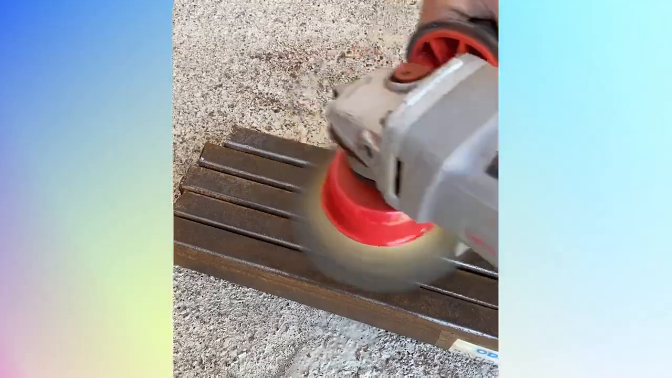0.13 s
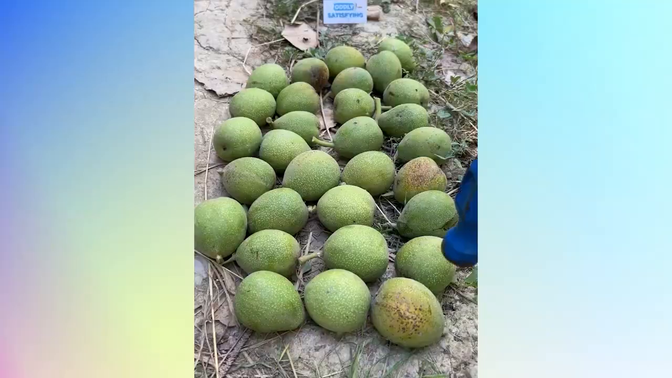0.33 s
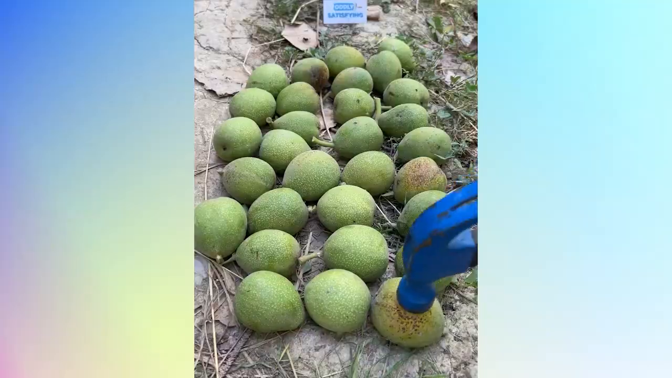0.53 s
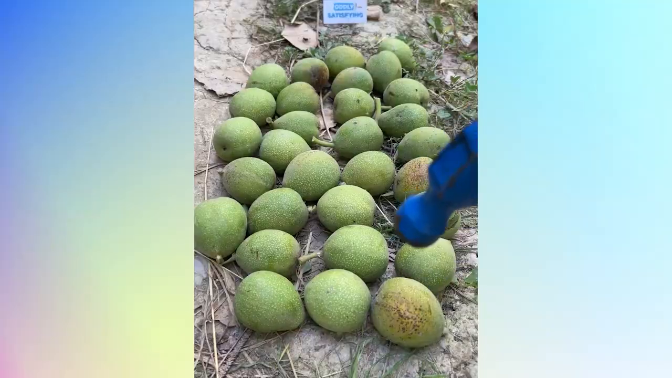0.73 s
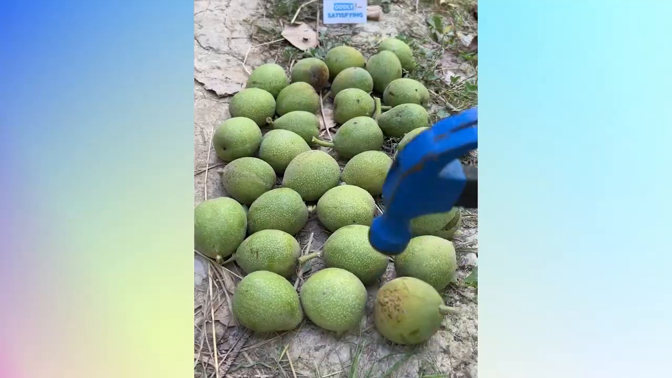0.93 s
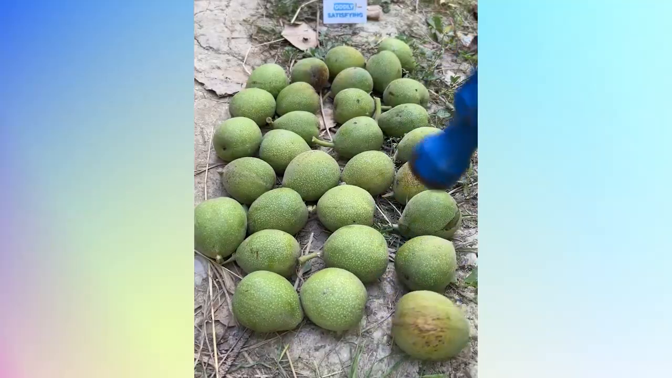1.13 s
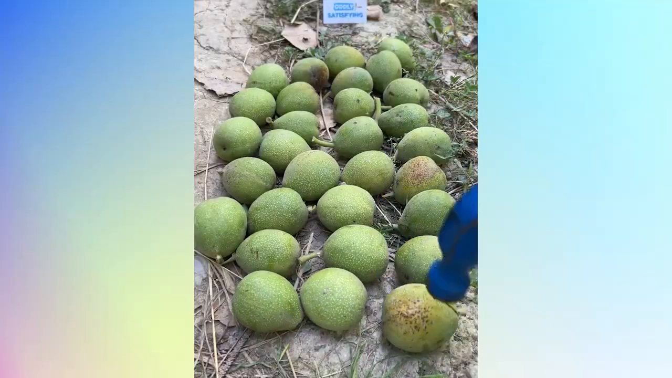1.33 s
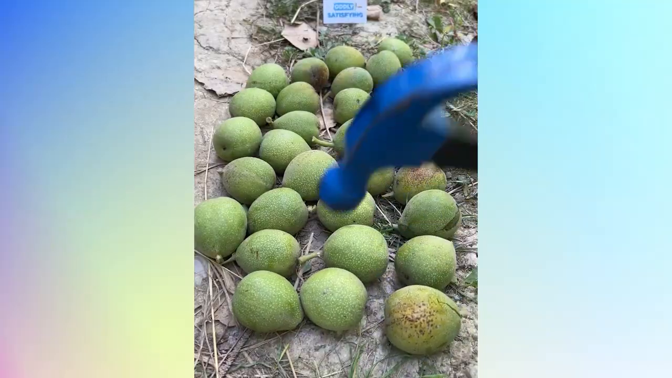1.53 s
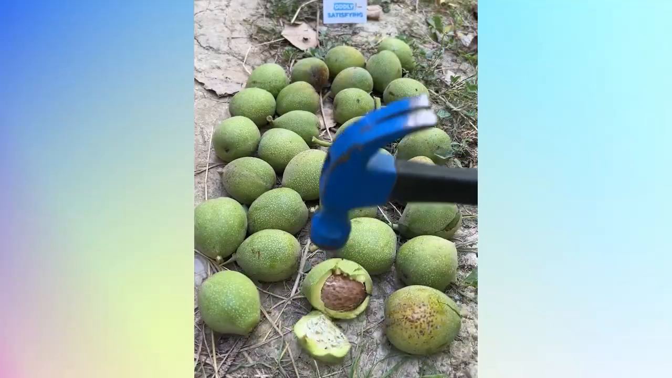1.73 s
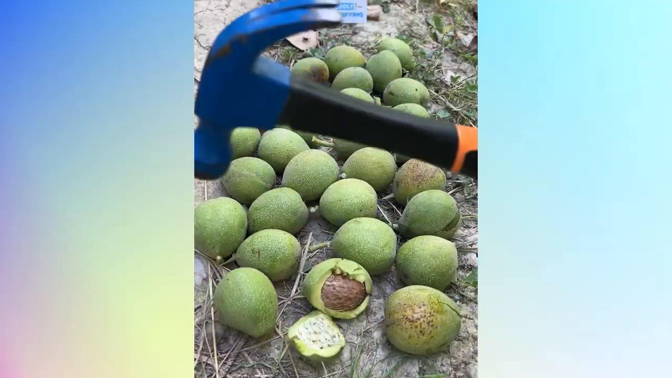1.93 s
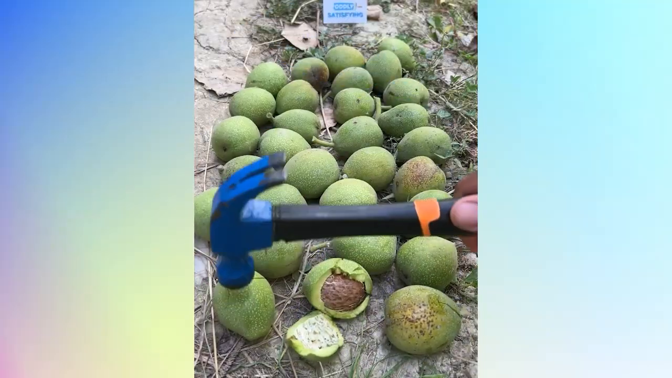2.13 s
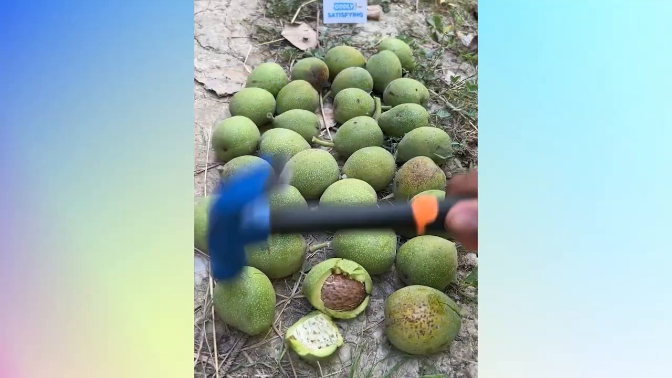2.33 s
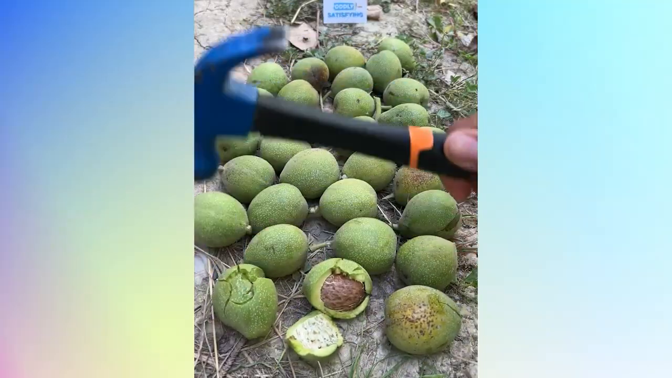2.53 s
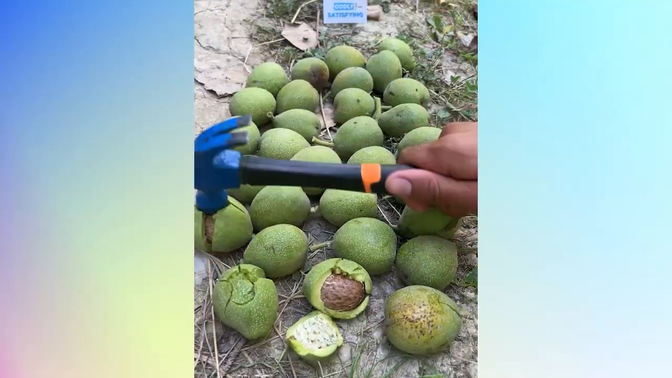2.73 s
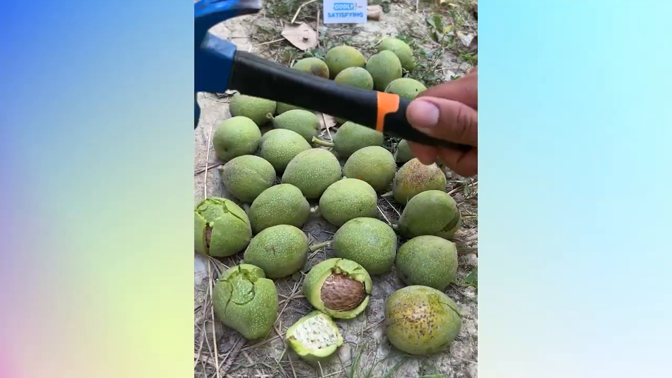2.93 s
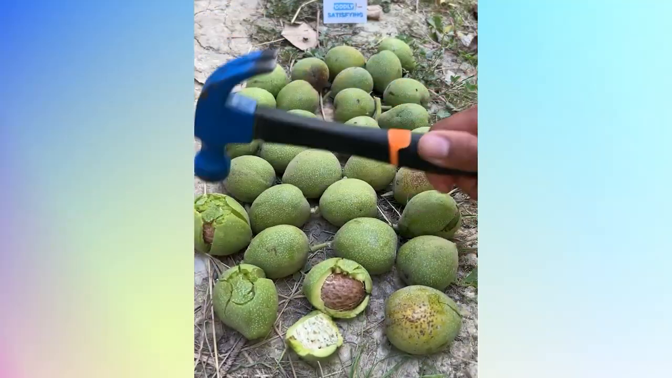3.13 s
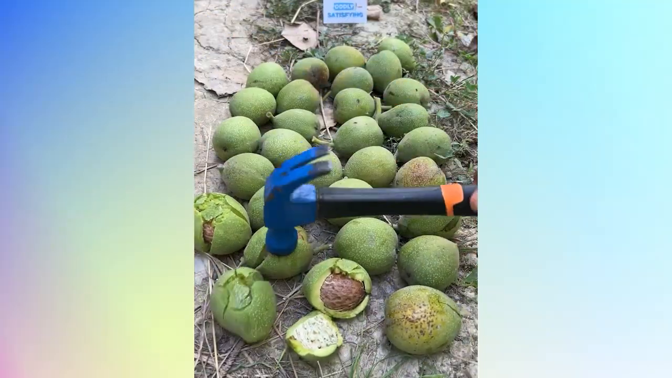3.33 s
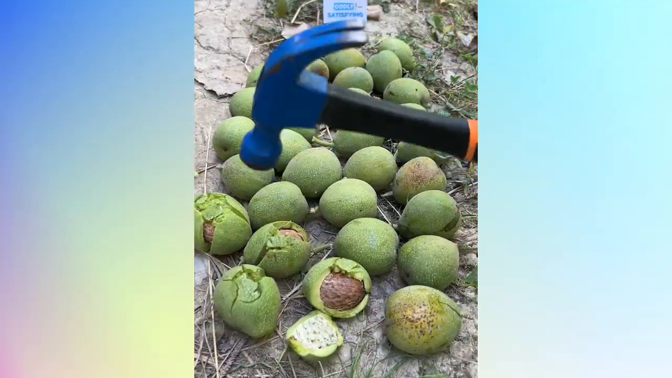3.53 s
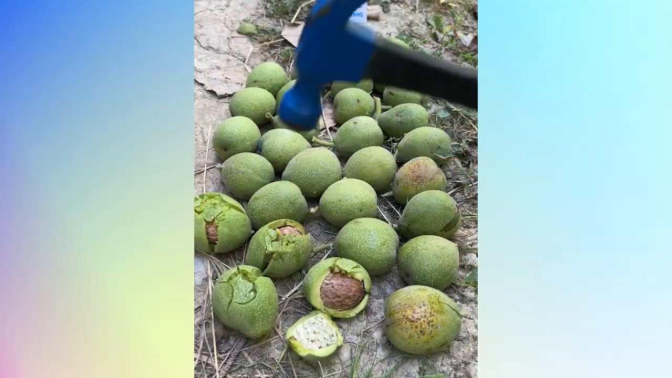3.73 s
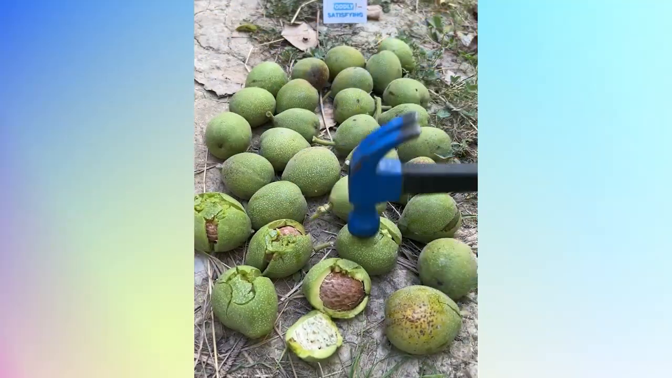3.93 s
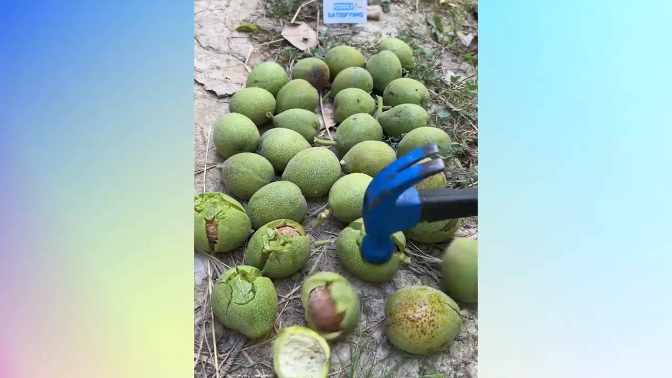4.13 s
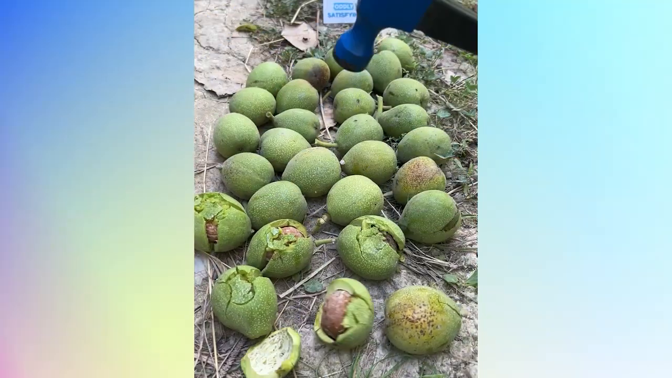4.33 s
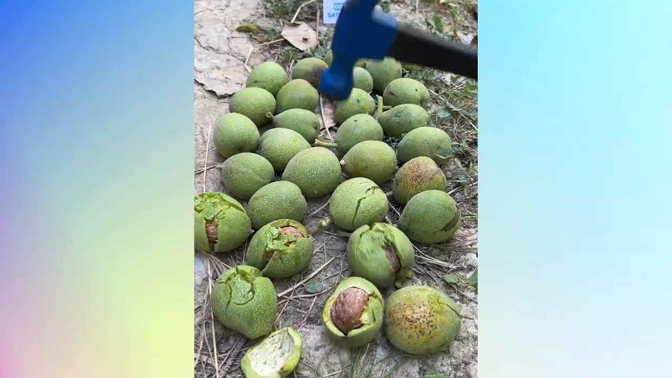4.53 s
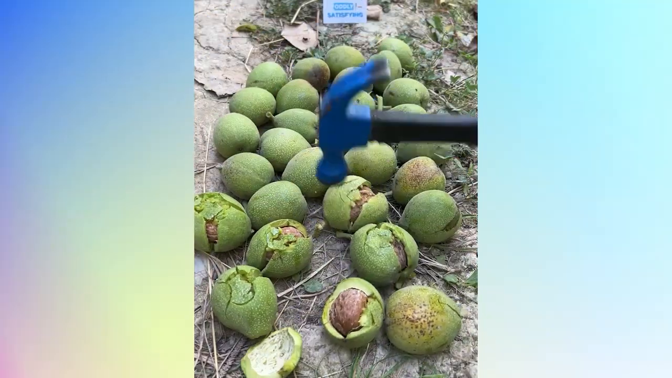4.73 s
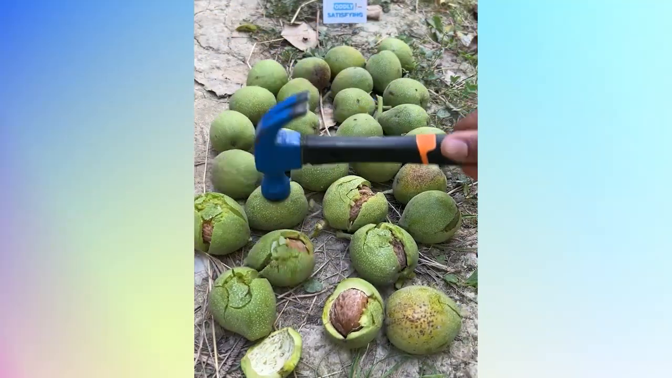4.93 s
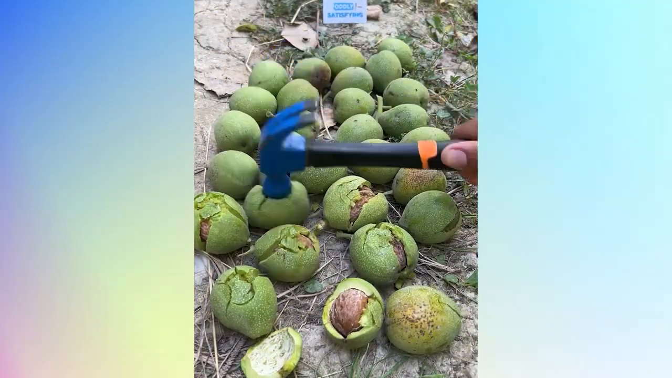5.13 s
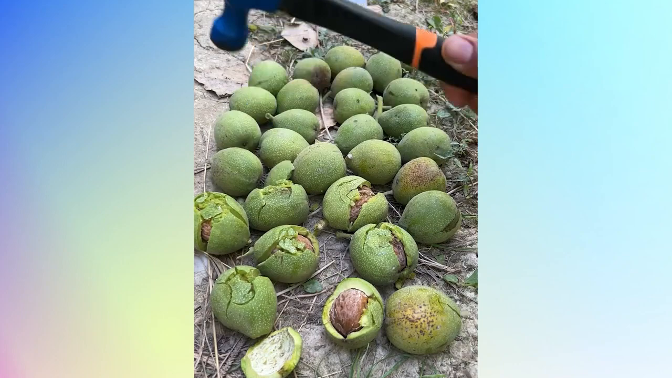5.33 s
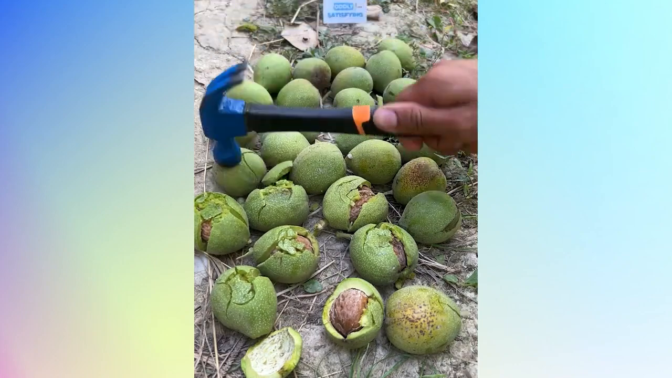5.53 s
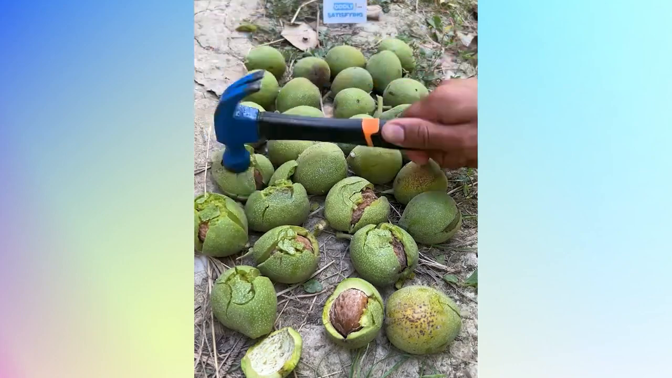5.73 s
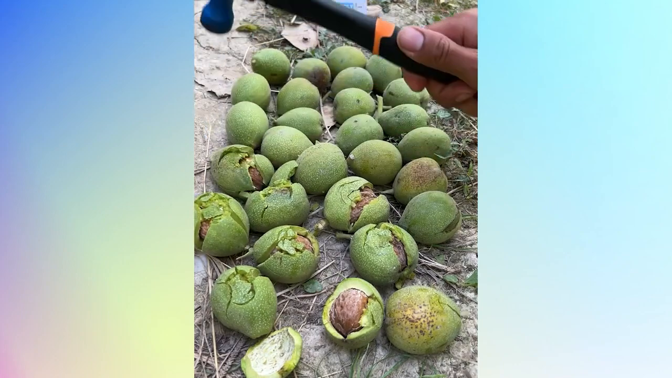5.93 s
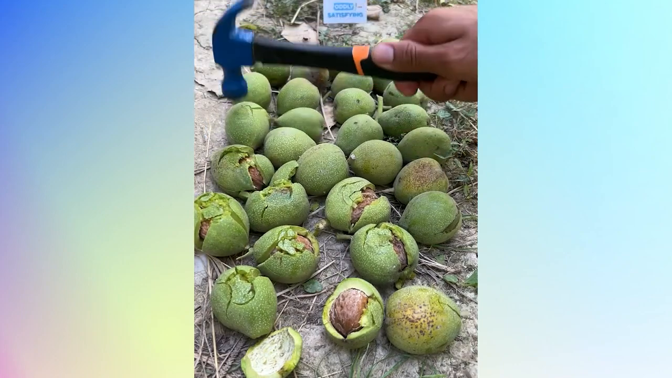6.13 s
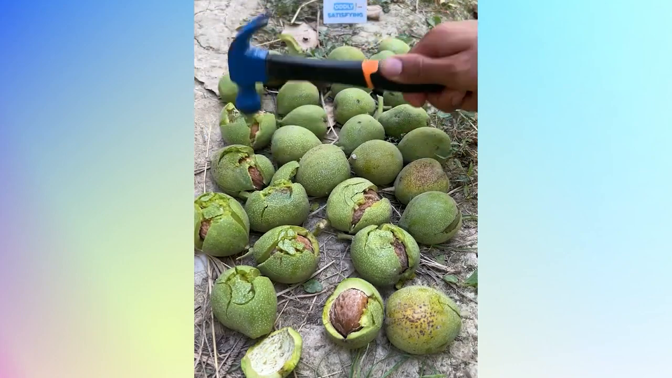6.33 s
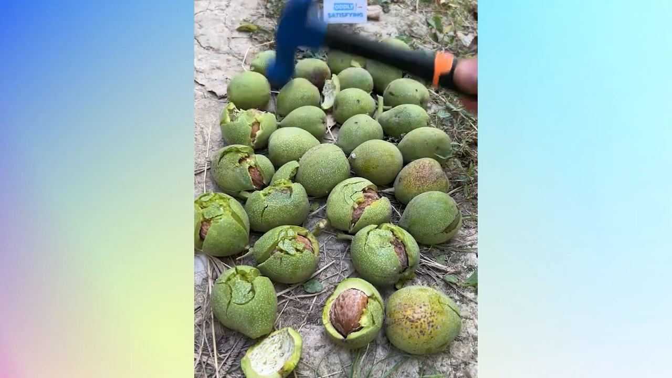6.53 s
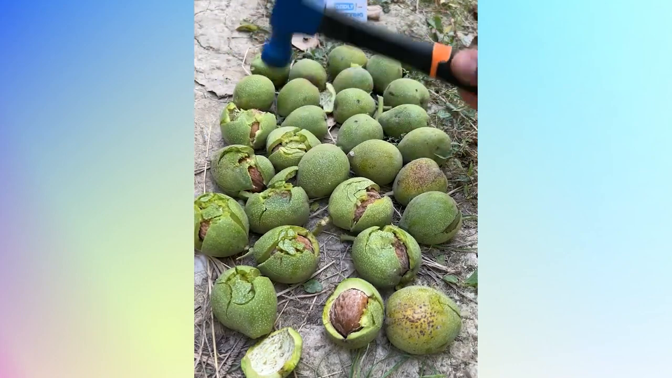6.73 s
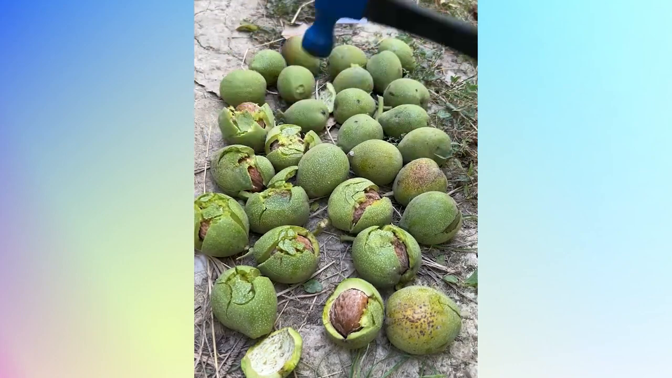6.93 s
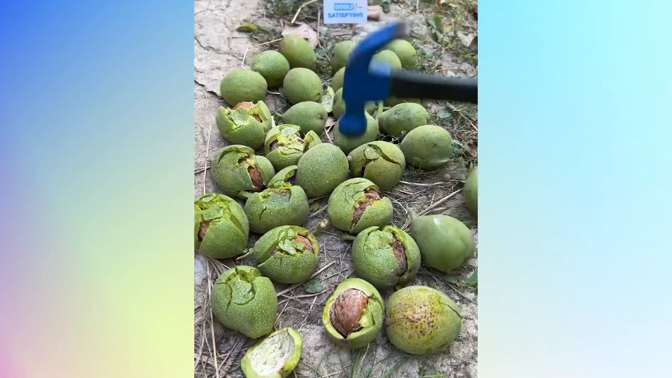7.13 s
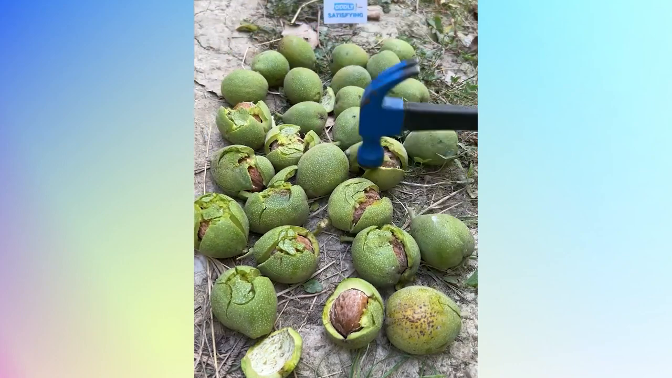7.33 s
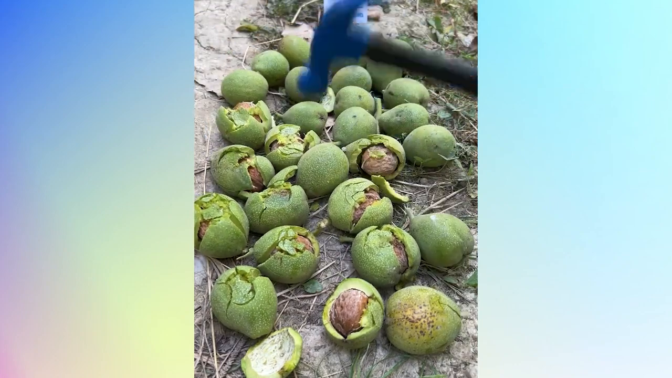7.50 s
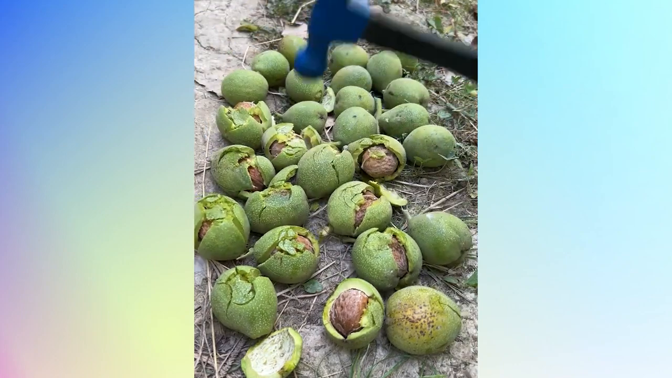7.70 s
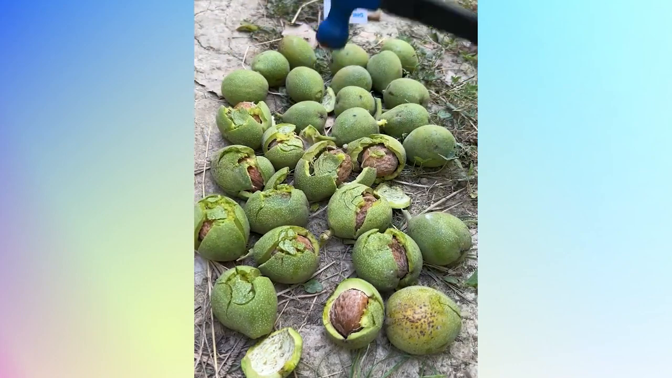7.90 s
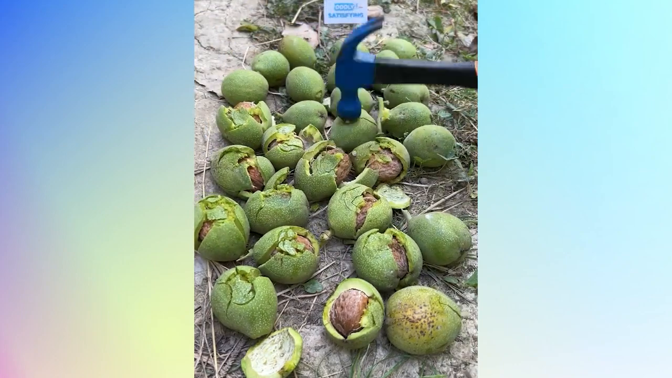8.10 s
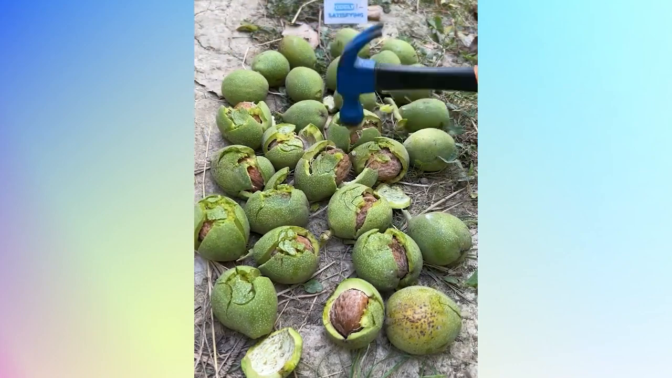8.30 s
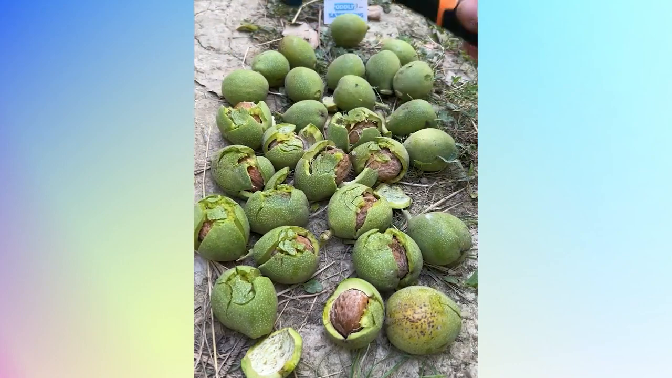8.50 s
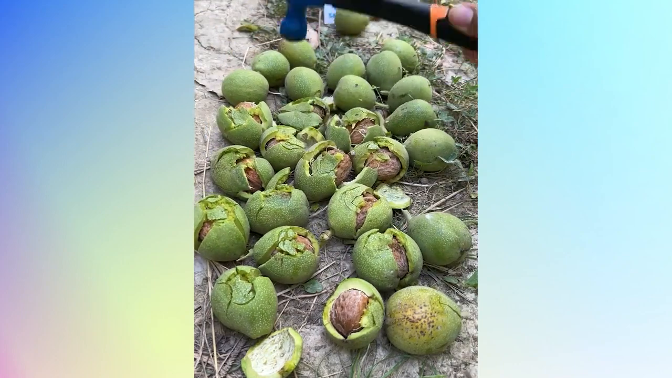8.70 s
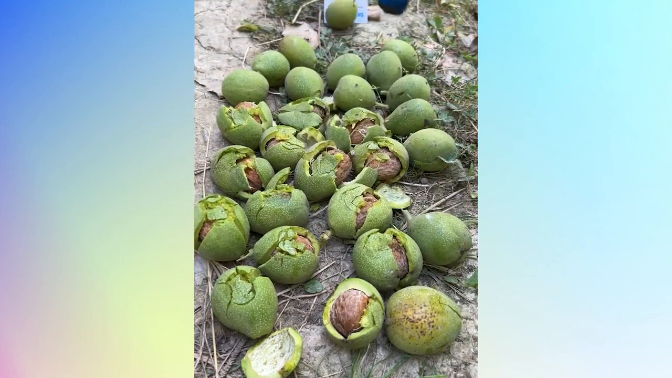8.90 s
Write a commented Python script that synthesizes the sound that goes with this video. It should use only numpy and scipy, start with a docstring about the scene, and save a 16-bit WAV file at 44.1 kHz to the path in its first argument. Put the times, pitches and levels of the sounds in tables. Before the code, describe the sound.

Close, steady hammer blows split moist nut husks outdoors, each a short hollow crack and soft ground thud, with little husk bits ticking between.

```python
"""Outdoors, on dry soil and straw, a hammer cracks green walnut husks one after another, close to the microphone.
Each blow is shaped noise for the torn husk, ringing nut and snap, a falling low swing for the thud, and grainy straw.
Bits of husk tick (short filtered noise) and split husks rustle (scraping noise with separate ticks).
Behind are air hiss, a breeze rumble and faint far-off tones, all made of filtered noise.
At the very start a faint grinder fades out: steady sine tones with brush hiss."""
import sys
import numpy as np
from scipy import signal
from scipy.fft import rfft, irfft
from scipy.io import wavfile
from scipy.ndimage import uniform_filter1d

SR = 44100
rng = np.random.default_rng(int(sys.argv[2]) if len(sys.argv) > 2 else 0)


def output_pcm(signal):
    """Save a mono or channel-first signal as 16-bit PCM at the path in sys.argv[1].

    Samples are clipped to [-1, 1] before scaling.
    """
    pcm = np.clip(np.atleast_2d(signal).T, -1, 1) * 32767
    wavfile.write(sys.argv[1], SR, np.round(pcm).astype(np.int16))


N = 395136
TIME = np.arange(N) / SR  # seconds

# hammer blows: [t/s, crack length scale/s, left over right level/dB, lag of the right side/s, husk level/dB,
#   knock f/Hz, knock level/dB, shell f/Hz, shell level/dB, snap level/dB,
#   thud f/Hz (the swing starts 1.1 times higher), thud level/dB, straw crunch level/dB]
BLOWS = [(0.8985, 0.0055, -22, -0.0024, -29, 870, -24.5, 1870, -22, -31, 95, -28.5, -72),
         (1.2976, 0.0041, -32.5, 0.0022, -23, 820, -13, 1420, -17, -23.5, 144.6, -29.5, -64),
         (1.698, 0.004, 15, -0.0031, -19.5, 624, -22, 1630, -16.5, -24, 102, -30.5, -60.5),
         (2.1406, 0.0033, 34.5, -0.0024, -31.5, 772, -12.5, 1874, -19.5, -23.5, 110.5, -31, -60.5),
         (2.4673, 0.0051, 7, 0.0093, -28, 920, -13, 1244, -14.5, -23, 139.7, -35, -64),
         (2.8374, 0.0041, 2, 0.012, -17.5, 757, -13, 1676, -18.5, -19, 138.4, -29, -57.5),
         (3.1442, 0.0051, -9, 0.0025, -41.5, 1110, -38, 2300, -36.5, -25, 92, -32, -64.5),
         (3.4394, 0.0045, 2, 0.0007, -30, 798, -20, 1347, -12, -21, 204, -39.5, -63),
         (3.713, 0.0029, -3.5, -0.0058, -35.5, 782, -26.5, 1735, -21.5, -18.5, 102, -27.5, -62.5),
         (3.995, 0.005, -27.5, 0.0033, -22.5, 790, -28.5, 1730, -26.5, -31.5, 187, -28.5, -62),
         (4.2224, 0.0069, 19.5, -0.0023, -33.5, 701, -35.5, 1578, -21.5, -27, 80.5, -31, -63.5),
         (4.5097, 0.0034, 10, -0.0077, -22.5, 1006, -21, 1776, -21.5, -23, 211, -33, -56),
         (4.7647, 0.0051, 13.5, -0.0047, -29, 545, -27.5, 1426, -25, -27.5, 122.7, -35, -67),
         (5.0245, 0.012, 3.5, -0.0045, -41, 872, -38.5, 1534, -48, -39.5, 75.8, -27.5, -62),
         (5.249, 0.0075, 2.5, -0.0004, -20, 586, -19.5, 1268, -16.5, -16.5, 184.5, -36.5, -62),
         (5.6119, 0.00056, 3, 0.0002, -56, 1100, -41.5, 1410, -21, -55.5, 72.8, -39.5, -66),
         (5.8356, 0.0054, 0.5, -0.0016, -24.5, 965, -18.5, 1534, -10.5, -21, 135.5, -39.5, -61),
         (6.1603, 0.0019, 6, 0.0024, -27, 910, -14.5, 1673, -17.5, -31, 89.2, -38.5, -59.5),
         (6.3824, 0.006, 0, 0.0031, -30.5, 960, -18, 1430, -16.5, -23, 159, -31.5, -58.5),
         (6.6725, 0.0021, -6.5, 0.0023, -28, 924, -17, 1680, -16, -24.5, 146, -34, -61.5),
         (6.8928, 0.0031, 31, -0.0032, -34.5, 740, -24, 1750, -17.5, -23.5, 80.2, -26, -60),
         (7.1597, 0.0076, -7.5, 0.0002, -35.5, 940, -13, 1800, -12, -20.5, 134, -25, -55.5),
         (7.3899, 0.005, -0.5, 0.011, -43.5, 790, -16.5, 1825, -13.5, -15.5, 101.2, -54.5, -57),
         (7.6495, 0.0063, 1.5, -0.0005, -25.5, 877, -11.5, 1510, -15, -21.5, 164.5, -33, -61.5),
         (7.8633, 0.013, 3, -0.0005, -50.5, 983, -44.5, 1525, -51, -42, 69, -36, -62.5),
         (8.155, 0.004, -28.5, 0.0036, -35.5, 836, -21.5, 1724, -14, -30, 87, -31.5, -60.5),
         (8.3691, 0.0033, 2, 0.0009, -35, 692, -26.5, 1550, -16.5, -23.5, 68.4, -37.5, -64),
         (8.6694, 0.0065, 7, -0.002, -47, 570, -37, 1570, -44, -36.5, 78, -43.5, -56.5)]
# bits of husk that drop or settle: [t/s, peak level/dB before sharing between sides, f/Hz, left over right level/dB]
HUSK_BITS = [(0.9794, -64, 2260, -1.0), (1.111, -54, 7000, -0.5), (2.571, -52.5, 2160, 3),
             (3.5782, -63, 1597, 1), (4.5881, -29.5, 1995, -8), (4.67, -34, 5870, -9),
             (5.266, -34.5, 5700, -7), (5.424, -48.5, 1770, 2), (6.6172, -42, 1850, 1.5),
             (7.3474, -47.5, 2674, 3), (7.5404, -51, 4620, 3), (8.2647, -51.5, 2264, 5),
             (8.513, -52, 7000, 2)]
# split husks that roll or slide in the straw: [start t/s, length/s, level/dB]
ROLLS = [(4.399, .04, -70), (4.552, .13, -55), (4.701, 0.044, -68), (5.35, 0.058, -60.5),
         (5.45, 0.057, -61.5), (5.536, 0.054, -70), (6.788, .025, -74), (7.413, 0.093, -65),
         (7.53, 0.042, -56), (8.487, 0.086, -75.5), (8.7, 0.031, -60)]
# faint far-off tones: [start t/s, end t/s, start f/Hz, end f/Hz, level/dB]
FAR_TONES = [(0.464, 0.603, 900, 1044, -73), (0.466, 0.604, 1980, 2160, -68),
             (1.685, 2.18, 236.4, 233, -64.5), (1.742, 2.172, 912, 924, -71.5),
             (1.798, 2.15, 1064, 1036, -78), (2.477, 2.707, 1800, 1637, -66.5),
             (2.892, 3.356, 405, 375, -77), (5.848, 6.15, 1576, 1743, -74), (6.35, 6.68, 1823, 1820, -72),
             (6.543, 7.001, 421, 397, -71.5)]
# loudness of the outdoor hiss over time: [t/s, level/dB before HISS_DB is added]
HISS_LEVEL = [(0.55, -69), (0.71, -68), (1.34, -71), (2.79, -67.5), (3.47, -73.5), (4.13, -67),
              (4.39, -71.5), (4.71, -68.5), (4.85, -73.5), (5.44, -67.5), (5.86, -73.5), (6.58, -66),
              (7.12, -71.5), (7.38, -66.5), (8.15, -77), (8.36, -68), (8.57, -65.5), (8.95, -73.5)]
# the grinder's motor hum: [f/Hz, level/dB before HUM_DB is added]
MOTOR_HUM = [(102.3, -89), (339.1, -93), (419.9, -100), (834.4, -99)]
# the whine of the grinder's gears: [f/Hz, level/dB before HUM_DB is added]
GEAR_WHINE = [(1206, -94), (2288, -92), (3451, -89), (4247, -91), (4673, -94), (5561, -90), (6896, -98)]
# tone colour of the snap in a crack: [f/Hz, relative level/dB]
SNAP_COLOUR = [(1200, -29), (2300, 3), (3150, 0.5), (4000, -5), (5000, 1), (6500, -2), (8400, -0.5),
               (9800, -6), (14000, -5.5), (16000, -22)]
# tone colour of straw crunching under a blow: [f/Hz, relative level/dB]
STRAW_COLOUR = [(100, -1.5), (400, 3.5), (1000, 0.5), (2500, 1.5), (4000, -2.5), (6500, -3.5), (9500, -11),
                (13500, -9.5), (16000, -21)]
# tone colour of husks shifting in the straw: [f/Hz, relative level/dB]
SHIFTING_COLOUR = [(300, -23.5), (2000, -4.5), (4000, -2.5), (6500, 1), (9500, -11), (13500, -8),
                   (16000, -25)]
# tone colour of the breeze on the microphone: [f/Hz, relative level/dB]
RUMBLE_COLOUR = [(12, -34), (20, -1.5), (107, -2), (145, -13.5), (189, -12.5), (280, -25), (300, -21),
                 (390, -59.5), (660, -120)]
# tone colour of the outdoor hiss: [f/Hz, relative level/dB]
HISS_COLOUR = [(120, -13.5), (200, -6), (330, -8), (600, -10.5), (1000, -13), (1400, -10), (2200, -5),
               (2900, -12), (3700, -16), (4800, -28.5), (8000, -34), (15000, -50)]
# tone colour of the grinder's wire brush: [f/Hz, relative level/dB]
BRUSH_COLOUR = [(200, -35), (380, -13), (650, -16), (1200, -8), (1800, -16), (2800, -7.5), (4200, -5),
                (5200, -12.5), (7600, -13), (9000, -38), (11800, -15), (14000, -40.5)]

LEAD_S = 0.015  # room kept before the crack's centre
THUD_EARLY_S = 0.003  # the soil starts to give this long before the blow time
ROLL_ATTACK_S, ROLL_RELEASE_S = 0.012, 0.016
STIR_DB = -85.5  # the straw never lies quite still
WIND_DB, WIND_RISES_AT_S, WIND_RISE_S = -60.5, 0.88, 0.1
GUST_DB, GUSTS_PER_S = 2, 6.2  # typical swing of the breeze, and its fastest rate
AIR_START_S = 0.392
HISS_DB, WANDER_DB = 5, 1.5  # added to the hiss level; typical wavering around it
GRINDER_GONE_S, GRINDER_FADE_POWER = 0.37, 0.96
HUM_DB, BRUSH_DB = 9, -66  # added to the hum and whine levels; level of the brush before the fade
EDGE_HZ = 14550  # upper limit of the whole sound


def hammer():
    """Every blow is a crack, a thud and a crunch; the crack reaches the two sides at its own level and time."""
    out = np.zeros((2, N))
    for s, length, pan_db, lag, *colour, thud_hz, thud_db, crunch_db in BLOWS:
        crack_sound = crack(max(length, 0.001), *colour, LEAD_S)
        straw = crunch(crunch_db)
        phases = rng.uniform(0, 2 * np.pi) + rng.normal(0, 1.2, 2)
        gains = sides(pan_db)
        delays = [max(-lag, 0), max(lag, 0)]  # a negative lag makes the left side late
        for side in range(2):
            add(out[side], s + delays[side] - LEAD_S - 0.0004, gains[side] * crack_sound)
            low = thud(thud_hz, thud_db, phases[side]) / np.sqrt(2)  # half the power to each side
            add(out[side], s - THUD_EARLY_S, low)
            add(out[side], s, straw[side])
    return out


def crack(length, husk_db, knock_hz, knock_db, shell_hz, shell_db, snap_db, lead, run_on_db=-26, snap_run_on_db=-19):
    """Fibres tear as the hammer presses in, driving the soft husk, the whole nut and its hard shell."""
    t = np.arange(4096) / SR - lead
    f = np.fft.rfftfreq(4096, 1 / SR) + 1  # keeps clear of 0 Hz
    u = abs(t) / (0.53 * length)
    press = np.exp(-0.5 * u ** np.where(t < 0, 4, 2.5))  # the force sets in faster than it lets go
    give = np.exp(-abs(t) / np.where(t < 0, 0.0028, 0.008))  # the skin dents first; the split runs on afterwards

    knock = resonance(f, knock_hz, 1.3)
    overtone = power_of(-14.5) * resonance(f, 1.664 * shell_hz, 4.7)
    shell = resonance(f, shell_hz, 2.3) + overtone
    nut = power_of(knock_db) * knock / knock.sum() + power_of(shell_db) * shell / shell.sum()
    nut_db = 10 * np.log10(nut.sum())

    body_tear = tearing(press + gain_of(run_on_db) * give, 0.94)
    body = irfft(body_tear * np.sqrt(nut))
    husk_tear = tearing(press + gain_of(-19.5) * give, 0.57)
    husk = irfft(husk_tear * np.sqrt(resonance(f, 300, 0.79)))
    snap_tear = tearing(press + gain_of(snap_run_on_db) * give, 2.8, size=241)
    snap = coloured(irfft(snap_tear), SNAP_COLOUR)
    return burst(husk, husk_db) + burst(body, nut_db) + burst(snap, snap_db)


def tearing(force, spread_db, size=31):
    """Spectrum of tiny fractures under a force: rippled in detail, even over wide bands."""
    spectrum = rfft(crackle(len(force), spread_db) * force)
    return spectrum / np.sqrt(uniform_filter1d(abs(spectrum) ** 2, size) + 1e-12)


def thud(hz, db, phase, settle_hz=48, soil_db=-4):
    """The nut is pushed into the soil: a few low swings that slow down, with a brief rumble of the ground."""
    t = np.arange(8192) / SR
    falling_hz = settle_hz + (1.1 * hz - settle_hz) * np.exp(-t / 0.023)
    turns = np.cumsum(falling_hz) / SR
    swing = t * np.exp(-t / 0.007) * np.sin(2 * np.pi * turns + phase)
    soil = ring(rng.standard_normal(len(t)) * np.exp(-t / 0.022), 46, 0.49)
    return burst(swing, db) + burst(soil, db + soil_db)


def crunch(db, after=0.061):
    """Straw and soil crumbs give way in clumps on both sides; db is about the level `after` seconds later."""
    t = np.arange(11025) / SR
    t60, settled = 0.2, 0.13  # seconds: time to fade by 60 dB, time to come to rest
    clumps = evened(uniform_filter1d(rng.standard_normal((2, len(t))), size=260, axis=1))
    crumbs = coloured(crackle((2, len(t)), 3.4), STRAW_COLOUR)
    grains = evened(crumbs * gain_of(2.4 * clumps))
    onset = 1 - np.exp(-t / 0.001)
    dying = gain_of(db - 60 * (t - after) / t60) * np.exp(-(t / settled) ** 4)
    return grains * onset * dying


def bits():
    """Small pieces of husk tick on the ground: brief crackles through a broad resonance."""
    out = np.zeros((2, N))
    t = np.arange(2048) / SR
    for s, db, hz, pan_db in HUSK_BITS:
        tick = ring(crackle(len(t), 2.2) * np.exp(-t / 0.0066), hz, 0.27)
        for side, gain in enumerate(sides(pan_db)):
            add(out[side], s, gain * gain_of(db) * tick / abs(tick).max())
    return out


def rustle(ticks_per_s=90, ticks_db=3, tick_s=0.002, clump_db=3.0):
    """Split husks roll and settle in the straw: an uneven scrape with separate ticks of snapping stems."""
    clumps = evened(uniform_filter1d(rng.standard_normal((2, N)), size=700, axis=1))
    scrape_noise = coloured(rng.standard_normal((2, N)), SHIFTING_COLOUR)
    scrape = evened(scrape_noise * gain_of(clump_db * clumps))
    snaps = (rng.random((2, N)) < ticks_per_s / SR) * rng.exponential(1, (2, N))
    dying = signal.lfilter([1], [1, -np.exp(-1 / (tick_s * SR))], snaps)  # each snap fades away
    ticks = coloured(dying * rng.standard_normal((2, N)), SHIFTING_COLOUR)
    motion = gain_of(STIR_DB) * outdoors() + sum(roll(*row) for row in ROLLS)
    return motion * evened(scrape + gain_of(ticks_db) * ticks)


def roll(start, length, db):
    """A rolling husk gets going quickly, keeps on while its sound builds and holds, then comes to rest."""
    t = np.maximum(TIME - start, 0)
    rise = np.minimum(t / ROLL_ATTACK_S, 1)
    fall = np.exp(-np.clip((t - length) / ROLL_RELEASE_S, 0, 20))
    return gain_of(db) * rise * fall


def wind(shared=0.7, calm=0.1):
    """A light breeze gets up, then stays, rumbling on the microphone in small gusts."""
    noise = rng.standard_normal((2, N)) + shared * rng.standard_normal(N)  # partly alike on both sides
    rumble = coloured(noise, RUMBLE_COLOUR)
    risen = (1 + np.tanh((TIME - WIND_RISES_AT_S) / WIND_RISE_S)) / 2
    strength = calm + (1 - calm) * risen
    return gain_of(WIND_DB + GUST_DB * wander(GUSTS_PER_S)) * strength * rumble * outdoors()


def air(patch_db=3.0, wisp_db=3, wavers_per_s=7):
    """An outdoor hiss that swells in patches wide in pitch and in thin wisps."""
    noise = coloured(rng.standard_normal((2, N)), HISS_COLOUR)
    z = signal.stft(noise, nperseg=2048, noverlap=1536)[2]
    drift_db = patch_db * patches(z.shape, size=(30, 12)) + wisp_db * patches(z.shape, size=(3, 10))
    hiss = evened(signal.istft(z * gain_of(drift_db), nperseg=2048, noverlap=1536)[1][:, :N])
    level = gain_of(HISS_DB + WANDER_DB * wander(wavers_per_s)) * curve(HISS_LEVEL)
    return level * hiss * outdoors()


def outdoors():
    """The outdoor air sets in abruptly, within 1.9 ms, once the grinder has gone."""
    return np.clip((TIME - AIR_START_S) / 0.0019, 0, 1)


def far_tones(blur=0.021):
    """Faint gliding tones come and go in the distance, blurred by a random flutter."""
    out = np.zeros((2, N))
    for start, end, start_hz, end_hz, db in FAR_TONES:
        n = max(int((end - start) * SR), 1000)
        pole = np.exp(-np.pi * blur * start_hz / SR)  # higher tones flutter faster
        turn = np.exp(2j * np.pi * np.cumsum(np.linspace(start_hz, end_hz, n)) / SR)
        for side in out:
            noise = rng.standard_normal(n) + 1j * rng.standard_normal(n)
            flutter = signal.lfilter([1], [1, -pole], noise)
            tone = (turn * flutter).real * signal.windows.tukey(n, 0.4)
            add(side, start, gain_of(db) * evened(tone))
    return out


def grinder():
    """A faint motor hum and gear whine of steady sines, with the noise of a wire brush, fading away."""
    hum = sum(gain_of(db) * np.sin(2 * np.pi * (hz * TIME + rng.random((2, 1)))) for hz, db in MOTOR_HUM + GEAR_WHINE)
    brush = coloured(rng.standard_normal((2, N)), BRUSH_COLOUR)
    fade = np.maximum(1 - TIME / GRINDER_GONE_S, 0) ** GRINDER_FADE_POWER
    return fade * (gain_of(HUM_DB) * hum + gain_of(BRUSH_DB) * brush)


def gain_of(db):
    """Decibels to gain."""
    return 10 ** (np.asarray(db) / 20)


def power_of(db):
    """Decibels to a ratio of powers."""
    return gain_of(db) ** 2


def evened(x):
    """Scales to an average strength (rms) of 1."""
    return x / np.sqrt(np.mean(x ** 2) + 1e-20)


def burst(x, db):
    """Gives a short sound the energy of 10 ms at this level."""
    return gain_of(db) * x / np.sqrt(np.sum(x ** 2) / (SR / 100) + 1e-20)


def curve(rows):
    """Gain over time from rows of (t/s, level/dB)."""
    return gain_of(np.interp(TIME, *np.transpose(rows)))


def coloured(x, points):
    """Filters x to a tone colour of (f/Hz, relative level/dB) points; rms 1."""
    f, db = np.transpose(points)
    hz = np.fft.rfftfreq(x.shape[-1], 1 / SR)
    gains = gain_of(np.interp(np.log(hz + 1), np.log(f + 1), db))
    return evened(irfft(rfft(x) * gains, x.shape[-1]))


def ring(x, hz, q):
    """A damped resonance, applied twice for steeper slopes."""
    b, a = signal.iirpeak(min(hz, SR * 0.45), max(q, 0.3), SR)
    return signal.lfilter(b, a, signal.lfilter(b, a, x))


def resonance(f, hz, q):
    """Power response of a damped resonance with steep slopes."""
    return 1 / (1 + (q * (f / hz - hz / f)) ** 2) ** 2


def crackle(shape, spread_db):
    """Dense tiny fractures of very uneven size."""
    return rng.standard_normal(shape) * gain_of(spread_db * np.minimum(rng.exponential(1, shape), 5))


def patches(shape, size):
    """A smooth random field over frequency and time, in patches of size (bins, frames)."""
    field = uniform_filter1d(rng.standard_normal(shape), size[0], axis=1)
    return evened(uniform_filter1d(field, size[1], axis=2))


def wander(rate):
    """Slow chance: a sum of sines up to this rate a second, rms 1."""
    t = np.linspace(0, N / SR, num=1000)
    speeds = rate * np.geomspace(0.1, 1, num=20)
    slow = sum(np.sin(2 * np.pi * (f * t + rng.random())) for f in speeds)
    return np.interp(TIME, t, evened(slow))


def sides(pan_db):
    """Left and right gains of constant total power; a positive value favours the left."""
    g = gain_of([pan_db / 2, -pan_db / 2])
    return g / np.linalg.norm(g)


def add(track, s, sound):
    """Mixes a sound into one channel at time s."""
    part = track[max(round(s * SR), 0):][:len(sound)]
    part += sound[:len(part)]


def scene():
    """All sources, left and right."""
    return hammer() + bits() + rustle() + wind() + air() + far_tones() + grinder()


def record(dry):
    """The loudest peaks are rounded off; then the top of the treble is cut away."""
    rounded = dry / (1 + dry ** 6) ** (1 / 6)
    lowpass = signal.firwin(127, EDGE_HZ, window=("kaiser", 9), fs=SR)
    return signal.oaconvolve(rounded, lowpass[None], "same", axes=1)


dry = scene()
out = record(dry)
output_pcm(out)
```